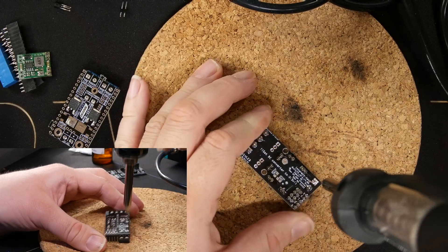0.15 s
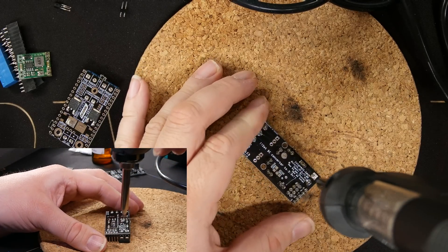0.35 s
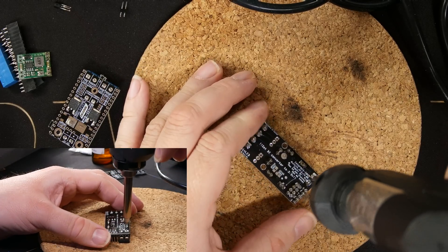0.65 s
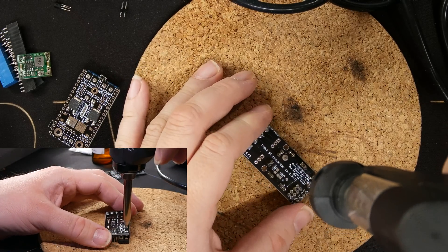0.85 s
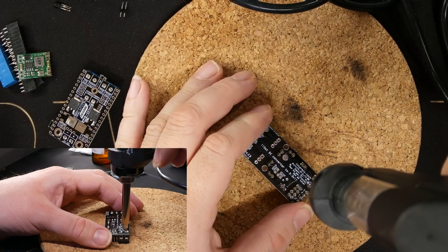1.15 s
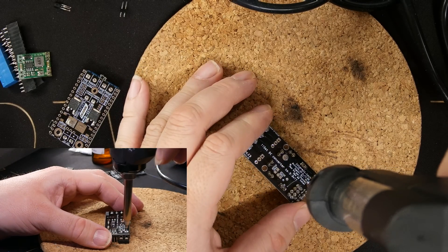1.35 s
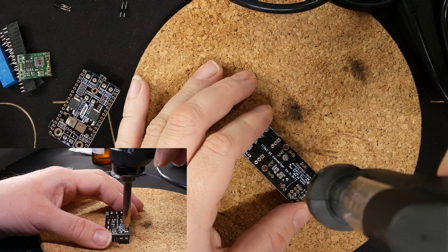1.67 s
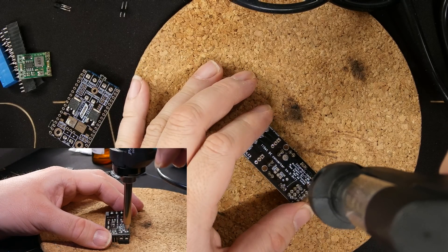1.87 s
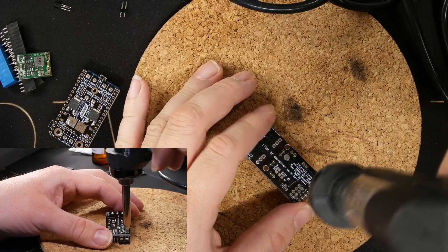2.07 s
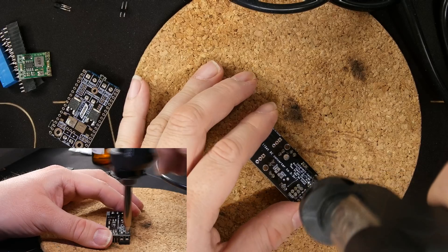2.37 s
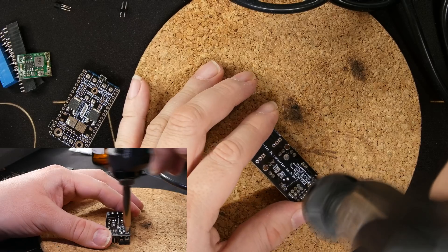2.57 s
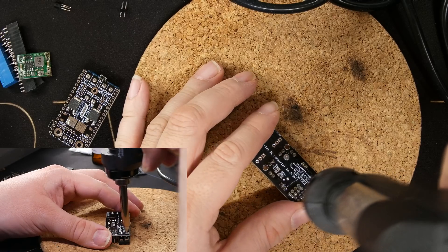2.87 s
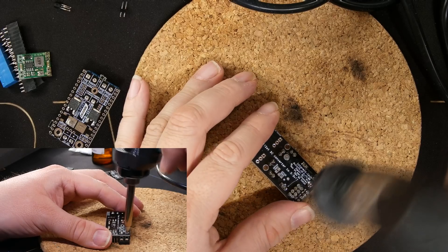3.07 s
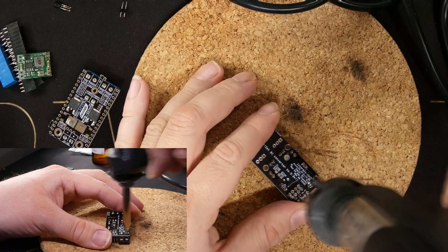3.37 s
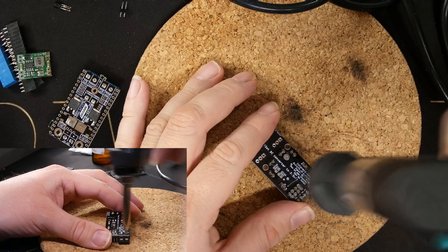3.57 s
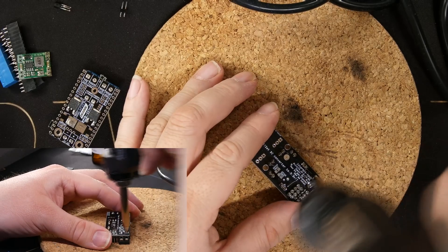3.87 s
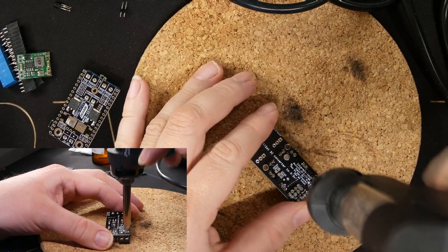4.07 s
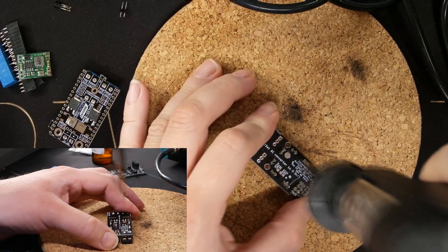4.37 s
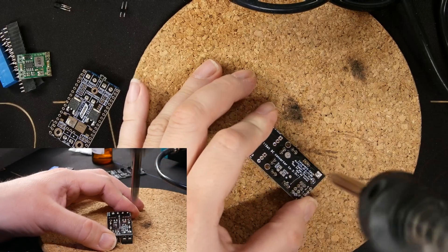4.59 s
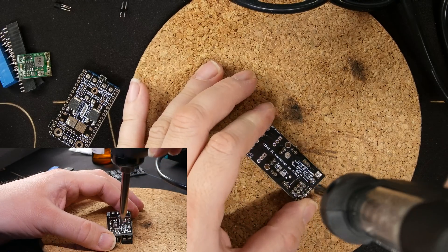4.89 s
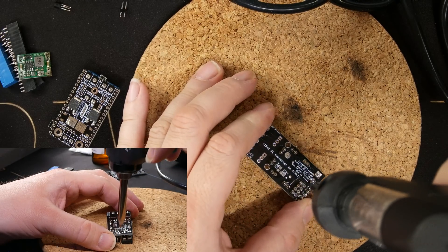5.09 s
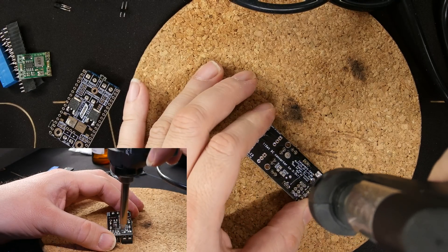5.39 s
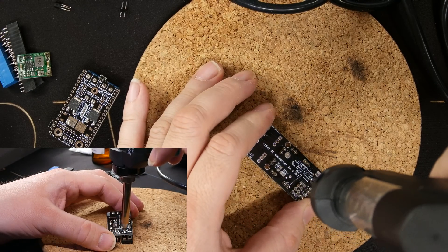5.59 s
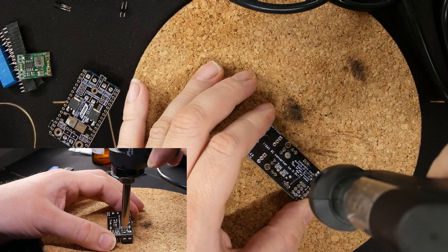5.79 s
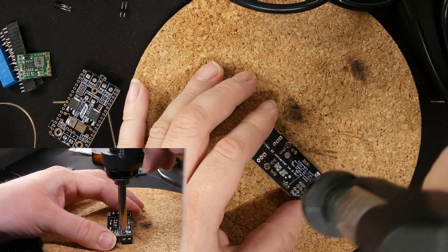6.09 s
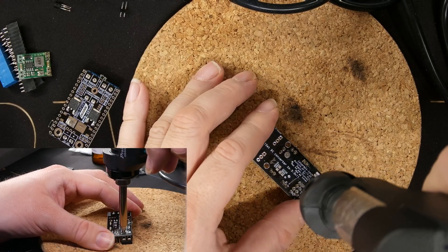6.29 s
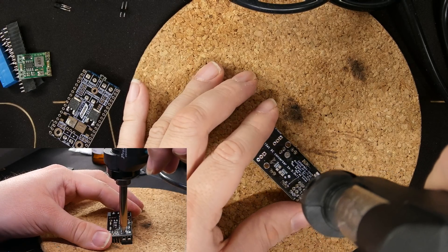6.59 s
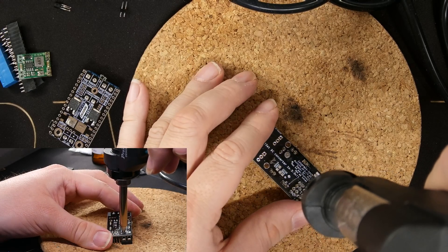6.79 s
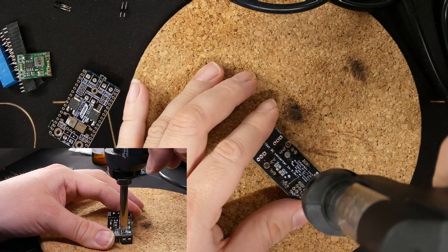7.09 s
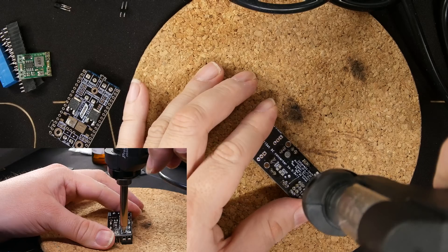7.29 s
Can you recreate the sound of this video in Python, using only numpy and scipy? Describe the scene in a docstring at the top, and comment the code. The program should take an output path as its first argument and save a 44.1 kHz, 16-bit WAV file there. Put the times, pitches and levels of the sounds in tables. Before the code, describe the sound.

A small desoldering pump coasts down, then after quiet taps clicks on, buzzes up to a hum, stops, and releases its vacuum with a pop and hiss.

```python
"""A desoldering gun is worked on a small circuit board on a cork mat, close to the microphone.
Its diaphragm pump spins up, draws air until the nozzle seals, hums, and coasts to a stop: one crank
drives the throb, valve clatter and pulsing air. Clicks, taps and bumps are short bursts or swings.
Lifting the nozzle breaks the vacuum with a pop and a hiss made of shaped noise.
Behind it lie quiet room noise and a faint electric whine made of pure tones."""
import sys
import numpy as np
from scipy import signal
from scipy.fft import rfft, irfft, next_fast_len
from scipy.io import wavfile
from scipy.ndimage import uniform_filter1d

SR = 44100
rng = np.random.default_rng(int(sys.argv[2]) if len(sys.argv) > 2 else 0)


def master(y):
    """Save y as 16-bit WAV."""
    cut = np.clip(np.atleast_2d(y).T, -1, 1)
    pcm = np.round(cut * 32767)  # scale
    wavfile.write(sys.argv[1], SR, pcm.astype(np.int16))


N = 328545
TIME = np.arange(N) / SR

# runs of the pump; the first is already coasting
# (motor on [s], motor off [s], throb level [dB], clatter level [dB], air level [dB])
PUMP_RUNS = [(-1.5, -.037, -12, -16, -5), (2.665, 3.998, 0, 0, 0), (6.911, 8, 0, 0, .5)]
# the changing load pulls the crank speed a little off its course: (time [s], speed change [Hz])
LOAD_PULL = [(2.83, -.3), (2.97, -1.6), (3.15, 1.3), (3.29, -.1), (3.48, 1.1), (3.57, 1), (3.78, -1),
             (4, .6), (7.1, 0), (7.22, -2.9), (7.32, -.2), (7.39, 1)]
# rattling is strong at low speed and settles under load: (crank speed [Hz], roughness [0-1])
ROUGHNESS_BY_SPEED = [(50, .9), (75, .55), (86, .3), (98, .18), (106, .12)]
# each low multiple of the crank speed swells as it crosses a resonance of the gun
# (relative level [dB], resonance [Hz], width [Hz], lift [dB])
THROB_ORDERS = [(-5.5, 98.5, 6.5, 9.5), (-5.5, 188, 32, 11.5), (-10, 324, 32, 8), (-25, 324, 36, 17)]
# how each voice of the pump follows the crank, one row each
# (level [dB], full above this speed [Hz], fall below it [dB per octave],
#  change when sealed [dB], fade once the motor is off [dB per s])
THROB_EFFORT = (-28.5, 72, 21, 0, 80)
CLATTER_EFFORT = (-42.3, 72, 14, 3, 50)
AIR_EFFORT = (-51.3, 88, 15, -12, 33)
# resonances of the plastic housing: (frequency [Hz], width [Hz], relative level [dB])
HOUSING_MODES = [(397.4, 40, 3.5), (529.4, 17, -2.5), (613.4, 32, -3), (747.7, 22, -5), (854, 39, 4),
                 (920, 16, 1), (945, 19, 3), (1020, 21.7, 4), (1075, 10.3, -1), (1245, 34, -4.5),
                 (1389, 100, -9.5), (1487, 18, -2), (1583, 50, -14), (1923.4, 12.2, 2), (1981, 99, -2.5),
                 (2198, 80, 0), (2250, 14, 0), (2367, 58, -1.5), (2463, 11, 1), (2604, 44, -6),
                 (2804, 25, -7), (3110, 39, -12), (3535, 35, -11), (4300, 320, -27), (4430, 20, -26)]
# the motor's springy mount: (frequency [Hz], width [Hz], relative level [dB])
MOUNT_MODES = [(880, 84, 1.5), (1015, 88, 0.5)]
# the motor can, rung by the brush ticks: (frequency [Hz], width [Hz], relative level [dB])
MOTOR_CAN_MODES = [(4120, 390, 1.5), (4320, 67, 17), (5300, 300, -8), (6630, 140, -11.5), (7070, 87, -2),
                   (8740, 740, -10.5), (10300, 620, -17)]
# tone colour of the pumped air: (frequency [Hz], relative level [dB])
AIR_SPECTRUM = [(1650, -34), (2800, -17.5), (3430, -2), (4110, -8), (4820, -4.5), (5110, -14), (5220, -11),
                (5820, -3), (6720, 1.5), (7600, -11), (8360, -4), (10800, -13), (11200, -18),
                (12200, -23.5), (15800, -23)]
# faint whistles of the air path: (frequency [Hz], width [Hz], relative level [dB])
AIR_WHISTLES = [(4970, 13, -2), (6160, 91, -8), (11400, 210, -23)]
# snaps of the trigger switch: (time [s], level [dB])
TRIGGER_SNAPS = [(2.6012, -40), (2.6526, -27), (3.9987, -23), (6.896, -28.5)]
# body of the switch: (frequency [Hz], width [Hz], relative level [dB])
SWITCH_MODES = [(1850, 220, 2.5), (2898, 260, 1.5), (3870, 430, -1), (6040, 690, -2), (6900, 750, 3.5),
                (9000, 680, -4.5), (10600, 1200, -5.5), (14200, 2000, -12)]
# ticks of loose plastic parts of the grip: (time [s], level [dB])
LOOSE_GRIP_TICKS = [(2.371, -46), (2.441, -42), (2.6095, -33.5), (4.104, -52), (6.834, -61), (6.92, -42)]
# body of the grip: (frequency [Hz], width [Hz], relative level [dB])
GRIP_MODES = [(1840, 230, 4.5), (2200, 260, -1.5), (3740, 120, 3), (6100, 250, -9), (6900, 100, -8),
              (9200, 200, -15)]
# the motor jolts its mount as it starts or stops: (time [s], level [dB])
MOTOR_JOLTS = [(.001, -48), (2.666, -37), (6.911, -31.5)]
# a thin ring dying away from the start: (time [s], level [dB], frequency [Hz], time to fall 60 dB [s])
LINGERING_RING = [(0, -66.5, 2290, 1)]
# tone colour of air seeping into the vacuum: (frequency [Hz], relative level [dB])
LEAK_SPECTRUM = [(530, -45), (900, -15), (1300, 1), (1510, -19), (1820, 1), (2570, -13), (3130, 0.5),
                 (4730, -10), (6350, -14), (15000, -37)]
# the seal breaking: (time [s], level [dB], time to fall 60 dB [s])
SEAL_POPS = [(4.3117, -31.5, 0.036), (4.323, -46, 0.22), (4.335, -47, .05)]
# tone colour of those pops: (frequency [Hz], relative level [dB])
POP_SPECTRUM = [(88, -30), (150, 5), (254, -4), (492, -7.5), (670, -16), (1590, -5.5), (2230, -47),
                (2770, -15), (3140, -32), (4990, -43), (6000, -38), (7800, -57), (13200, -120)]
# tone colour of the air rushing in: (frequency [Hz], relative level [dB])
INRUSH_SPECTRUM = [(240, -24), (400, 4), (625, -17), (675, 0), (740, -16), (976, -1), (1350, -15),
                   (2490, -4), (5140, -15), (6470, -5.5), (7550, -10), (11300, -9.5), (15800, -19)]
# solder spitting in the nozzle: (time [s], level [dB])
SOLDER_SPITS = [(4.492, -52), (4.508, -54), (4.523, -54), (4.592, -57), (4.608, -63), (4.642, -61)]
# nozzle touching the board: (time [s], level [dB], brightness [Hz], time to fall 60 dB [s])
NOZZLE_TAPS = [(.58, -61.5, 2200, .12), (.868, -58, 1260, .064), (.912, -62, 960, .035),
               (.984, -67, 1070, .12), (1.161, -59, 1530, .063), (1.4695, -50.5, 1900, .036),
               (1.524, -59, 1360, .11), (1.754, -64.5, 1370, .21), (1.916, -49, 1200, .15),
               (1.933, -49, 453, .085), (4.104, -50, 1300, .05), (4.586, -58.5, 3080, .044),
               (5.426, -56, 1480, .05), (5.654, -62.5, 1480, .093), (5.69, -65, 1400, .05),
               (6.352, -66, 1400, .057)]
# board and hand bumping on the mat: (time [s], relative level [dB], pitch [Hz])
MAT_BUMPS = [(.005, -45, 95), (.013, -38, 46), (.1, -49, 55), (.236, -47, 50), (1.469, -56, 100),
             (1.525, -54, 74), (1.789, -49, 44), (1.932, -38.5, 72), (1.99, -40.5, 55), (2.47, -50, 51),
             (2.63, -39, 29), (3.83, -31, 45), (3.87, -33, 25), (4.12, -36, 55), (4.316, -37, 75),
             (4.37, -38, 35), (5.432, -49, 82), (5.66, -48, 80), (5.74, -49, 61), (5.899, -52, 80)]
# tone colour of the quiet room: (frequency [Hz], relative level [dB])
ROOM_SPECTRUM = [(15, -50), (25, -2), (82, -11.5), (216, -8.5), (307, -12.5), (461, -12), (500, -15.5),
                 (905, -20), (2390, -30.5), (3130, -30), (3880, -33), (6660, -33), (15800, -35)]
# three timbres of the faint electric whine: (frequency [Hz], level before the spell's own [dB])
FULL_WHINE = [(3090, -84), (5146, -88), (6519, -92), (6864, -87), (8920, -92), (9265, -92), (9604, -90),
              (10977, -95), (11321, -95)]
PLAIN_WHINE = [(3090, -79.5), (6519, -88), (9259, -93), (9604, -91), (9948, -95)]
THIN_WHINE = [(3090, -86.5), (4457, -92), (4802, -92), (5146, -93), (6519, -89.5), (7203, -94), (8920, -90),
              (9265, -92), (10632, -93), (11321, -96)]
# when the whine is heard: (from [s], to [s], level change [dB], timbre [one of the tables above])
WHINE_SPELLS = [(.21, 0.603, 2.5, FULL_WHINE), (.6, .91, -1.5, FULL_WHINE), (1.14, 1.92, 1, FULL_WHINE),
                (2.3, 2.603, 0, FULL_WHINE), (4.84, 5.125, 2.5, PLAIN_WHINE),
                (5.264, 5.597, -0.5, PLAIN_WHINE), (5.855, 6.72, 1, THIN_WHINE)]

# the crank closes in on full speed with a quick kick and a slower climb
FULL_HZ, KICK_HZ, KICK_S, CLIMB_HZ, CLIMB_S = 107, 16, .04, 47, .225
# switched off, it is braked by drag and by dry friction
DRAG_S, FRICTION_HZ_PER_S = .45, 211
# the nozzle is half sealed this long after each start, and takes this long to close
SEAL_AFTER_S, SEAL_CLOSE_S = .41, .11
# the clatter comes in uneven knocks at low speed (typical swing at full roughness, changes per second)
KNOCK_DB, KNOCK_RATE_HZ = 3, 40
# each switch snap bounces once: this much later, this much weaker
BOUNCE_S, BOUNCE_DB = .0013, -4.5
# air seeps in from the motor's stop until the nozzle lifts: a first gush over an even trickle
STOP_S, LIFT_S = 4.02, 4.314
GUSH_DB, GUSH_T60_S, TRICKLE_DB = -56, .35, -62
# the inrush weakens as the chamber fills, then dies away; one surge comes just after the lift
INRUSH_DB, INRUSH_FALL_DB_PER_S, FILL_S, INRUSH_T60_S = -51, 38, .31, .3
SURGE_AFTER_S, SURGE_DB, SURGE_T60_S = .022, -49, .06
BUMP_T60_S = .27  # the mat damps all bumps alike
ROOM_DB = -65.8
TOP_HZ = 15900


def pump():
    """Crank speed drives the throb, the valves, the brushes and the pulsing air."""
    runs = np.array(PUMP_RUNS)
    latest_run = np.searchsorted(runs[:, 0], TIME) - 1
    on, off, *run_db = runs[latest_run].T
    age = TIME - on
    idle = np.maximum(TIME - off, 0)
    speed = crank_speed(age, idle)
    turns = np.cumsum(speed) / SR
    rough = np.interp(speed, *np.transpose(ROUGHNESS_BY_SPEED))
    sealed = np.clip((age - SEAL_AFTER_S) / SEAL_CLOSE_S + .5, 0, 1) * (TIME < off)

    # the gun sways in the hand as it shakes
    sway = colour(noise(), [(15, 4), (30, -4), (60, -17), (110, -35), (200, -36)])
    hum = throb(turns, speed, rough) + undb(-25) * sway
    knocks = undb(KNOCK_DB * rough * wander(KNOCK_RATE_HZ))
    clatter = (valves(turns, rough) + undb(-34.5) * brushes(turns, rough)) * knocks

    voices = zip([hum, clatter, airflow(turns)], [THROB_EFFORT, CLATTER_EFFORT, AIR_EFFORT], run_db)
    return sum(voice * undb(db) * effort(law, speed, sealed, idle) for voice, law, db in voices)


def crank_speed(age, idle):
    """Turns per second: the motor spins up, hums under its load, and coasts to a stop."""
    spin_up = FULL_HZ - KICK_HZ * np.exp(-age / KICK_S) - CLIMB_HZ * np.exp(-age / CLIMB_S)
    driven = spin_up + curve(LOAD_PULL)
    friction = FRICTION_HZ_PER_S * DRAG_S
    return np.maximum((driven + friction) * np.exp(-idle / DRAG_S) - friction, 0)


def effort(law, speed, sealed, idle):
    """Gain of one pump voice: it grows with speed, shifts with the seal, and fades with the motor off."""
    db, knee_hz, db_per_octave, sealed_db, fade_db_per_s = law
    octaves = np.log2(np.clip(speed / knee_hz, 1e-6, 1))
    return undb(db + db_per_octave * octaves + sealed_db * sealed - fade_db_per_s * idle)


def throb(turns, speed, rough):
    """The diaphragm stroke shakes the gun at low multiples of crank speed, unevenly at low speed."""
    even = 0
    for order, (db, hz, width_hz, lift_db) in enumerate(THROB_ORDERS, start=1):
        lift = lift_db / (1 + (2 * (order * speed - hz) / width_hz) ** 2)
        even = even - undb(db + lift) * np.cos(2 * np.pi * order * turns)
    shake = colour(noise(), [(40, -36), (90, -2), (200, -3), (340, -5.5), (480, -30.5), (900, -40)])
    return (1 - rough ** 2) * even + undb(2) * rough ** 2 * steady(shake)


def valves(turns, rough):
    """Outlet and inlet valves slap in turn and ring the plastic housing; the crank rubs between."""
    outlet = slaps(turns, .06, rough, scatter_db=5, jitter_s=.0001)
    inlet = slaps(turns, .598, rough, scatter_db=7, jitter_s=.00016)
    rub = noise() * puffs(turns, .1, depth=.9) * rough
    force = steady(outlet + .3 * inlet) + 1.25 * rub
    # the hand's grip shifts, so each resonance swells and sinks on its own
    body = 0
    for k, (hz, width_hz, db) in enumerate(HOUSING_MODES):
        body = body + (-1) ** k * undb(db + 2 * wander(4)) * band(force, hz, width_hz)
    # the slap itself is a short crack besides the ringing
    crack_filter = signal.butter(3, [1980, 2680], "band", fs=SR, output="sos")
    crack = undb(-9) * signal.sosfilt(crack_filter, force)
    # at low speed the motor chatters on its mount
    chatter = undb(11) * rough * ring(rub, MOUNT_MODES)
    low_cut = signal.butter(4, 370, "high", fs=SR, output="sos")
    return steady(signal.sosfilt(low_cut, body + crack + chatter))


def brushes(turns, rough):
    """The motor brushes tick once per turn and ring the motor can."""
    ticks = slaps(turns, .3, rough, scatter_db=6, jitter_s=.00004)
    return steady(ring(ticks, MOTOR_CAN_MODES))


def slaps(turns, lag, rough, scatter_db, jitter_s):
    """One short knock each turn; roughness makes its force and timing uneven."""
    at = np.interp(np.arange(1, int(turns[-1]) - 1) + lag, turns, np.arange(N))
    loose = rough[at.astype(int)]
    chance = rng.standard_normal((len(at), 2))
    at = np.clip(at + jitter_s * SR * loose * chance[:, 0], 0, N - 2)
    force = undb(scatter_db * loose * chance[:, 1])
    # share each knock between two neighbouring samples, to place it exactly
    first, part = at.astype(int), at % 1
    return np.bincount(first, force * (1 - part), N) + np.bincount(first + 1, force * part, N)


def airflow(turns):
    """Air hisses in one surge per turn and whistles in its channel."""
    surges = noise() * puffs(turns, .3, depth=.36)
    return colour(surges, AIR_SPECTRUM) + undb(-7.5) * unit(ring(surges, AIR_WHISTLES))


def puffs(turns, lag, depth):
    """A strength that swells once per turn, as a surge of air or a rub does."""
    return 1 + np.clip(depth, 0, 1) * np.cos(2 * np.pi * (turns - lag))


def trigger():
    """The grip ticks, the switch snaps and bounces, the motor jolts its mount, and a thin ring lingers."""
    grip = strikes(LOOSE_GRIP_TICKS, GRIP_MODES, t60=0.0076, tail_db=-16, tail_t60=0.16)
    bounces = [(s + BOUNCE_S, db + BOUNCE_DB) for s, db in TRIGGER_SNAPS]
    switch = strikes(TRIGGER_SNAPS + bounces, SWITCH_MODES, t60=0.0069, tail_db=-20, tail_t60=0.17)
    jolt = strikes(MOTOR_JOLTS, MOUNT_MODES, t60=0.053, tail_db=-11.5, tail_t60=0.26)
    thin = 0
    for s, db, hz, t60 in LINGERING_RING:
        tone = steady(band(band(noise(), hz, 64), hz, 57))
        thin = thin + undb(db) * decay(s, t60) * tone
    return grip + switch + jolt + thin


def vacuum():
    """Air seeps past the nozzle, then pops and rushes in as it lifts, spitting solder."""
    seep = (undb(TRICKLE_DB) + undb(GUSH_DB) * decay(STOP_S, GUSH_T60_S)) * during(STOP_S, LIFT_S)
    pops = colour(noise(), POP_SPECTRUM) * sum(undb(db) * decay(s, t60) for s, db, t60 in SEAL_POPS)

    since = np.maximum(TIME - LIFT_S, 0)
    dying = np.exp(-np.log(1000) * np.maximum(since - FILL_S, 0) / INRUSH_T60_S) * (TIME > LIFT_S)
    flutter = undb(1.5 * wander(40))
    inrush = undb(INRUSH_DB - INRUSH_FALL_DB_PER_S * since) * dying * flutter
    surge = undb(SURGE_DB) * decay(LIFT_S + SURGE_AFTER_S, SURGE_T60_S)

    spit_modes = [(11600, 1000, 2), (12300, 700, -7)]
    spits = strikes(SOLDER_SPITS, spit_modes, t60=0.039, tail_db=-22, tail_t60=.1)
    leak = seep * colour(noise(), LEAK_SPECTRUM)
    return leak + pops + (inrush + surge) * colour(noise(), INRUSH_SPECTRUM) + spits


def board():
    """The nozzle taps the damped board; the mat and bench answer with dull bumps."""
    out = np.zeros(N)
    grit = noise()
    for s, db, hz, t60 in NOZZLE_TAPS:
        knock = unit(band(band(grit, hz, .8 * hz), hz, 1.3 * hz))
        out += undb(db) * decay(s, t60) * knock
    for s, db, hz in MAT_BUMPS:
        angle = 2 * np.pi * hz * (TIME - s)
        swing = np.sin(angle) + 0.43 * np.sin(1.6 * angle)
        # the difference of two decays gives a soft start
        out += undb(db) * (decay(s, BUMP_T60_S) - decay(s, BUMP_T60_S / 10)) * swing
    return out


def background():
    """Quiet room noise and an on-and-off electric whine of pure tones."""
    out = undb(ROOM_DB) * colour(noise(), ROOM_SPECTRUM)
    for start, end, spell_db, partials in WHINE_SPELLS:
        whine = 0
        for hz, db in partials:
            whine = whine + undb(db) * np.sqrt(2) * np.sin(2 * np.pi * (hz * TIME + rng.random()))
        out = out + undb(spell_db) * during(start, end) * whine
    return out


def strikes(rows, modes, t60, tail_db, tail_t60):
    """Short gritty contacts, each with a weak rattling tail, ring a body."""
    force = sum(undb(db) * (decay(s, t60) + undb(tail_db) * decay(s, tail_t60)) for s, db in rows)
    grit = np.sign(noise())
    return ring(grit * force, modes) / np.std(ring(grit, modes))


def ring(x, modes):
    """A body that rings at several resonances, with alternating signs."""
    return sum((-1) ** k * undb(db) * band(x, hz, width) for k, (hz, width, db) in enumerate(modes))


def band(x, hz, width_hz):
    """One resonance, gain 1 at its centre."""
    return signal.lfilter(*signal.iirpeak(hz, hz / width_hz, fs=SR), x + 1e-18)


def colour(x, points):
    """Give a sound a spectrum of (frequency [Hz], level [dB]) points, at rms 1."""
    hz, db = np.transpose(points)
    size = next_fast_len(N)
    bins = np.arange(size // 2 + 1) * SR / size
    gain = undb(np.interp(np.log(bins + 1), np.log(hz), db))
    return unit(irfft(rfft(x, size) * gain, size)[:N])


def decay(start, t60):
    """A sudden start that dies by 60 dB in t60 seconds."""
    out = np.zeros(N)
    span = slice(int(start * SR), int((start + 2 * t60) * SR))
    out[span] = np.exp(-np.log(1000) * (TIME[span] - TIME[span][0]) / t60)
    return out


def during(start, end):
    """1 between two times, with soft edges."""
    return uniform_filter1d(((TIME >= start) & (TIME <= end)) * 1., size=200)


def curve(rows):
    """The second column of a table, joined by straight lines in time."""
    rows = np.array(rows)
    return np.interp(TIME, rows[:, 0], rows[:, 1])


def wander(rate_hz):
    """A slow random drift with a spread near 1."""
    steps = np.arange(0, TIME[-1] + 1, 1 / rate_hz)
    return np.interp(TIME, steps, rng.standard_normal(len(steps)))


def steady(x):
    """Hold a sound near rms 1 over a few crank turns."""
    power = uniform_filter1d(uniform_filter1d(x ** 2, size=1300), size=1300)
    floor = np.mean(x ** 2) / 10 ** 4  # keeps near-silence from being blown up
    return x / np.sqrt(np.abs(power) + floor)


def unit(x):
    """Scale to rms 1."""
    return x / np.sqrt(np.mean(x ** 2))


def noise():
    """White noise."""
    return rng.standard_normal(N)


def undb(db):
    """Decibels to gain."""
    return 10 ** (np.asarray(db) / 20)


def scene():
    """Everything on the bench, heard by one microphone."""
    return (pump() + trigger() + vacuum() + board() + background())[None]


def record(dry):
    """The recorder cuts the top."""
    top_cut = signal.ellip(10, .2, 70, TOP_HZ, fs=SR, output="sos")
    return signal.sosfilt(top_cut, dry)


dry = scene()
out = record(dry)
master(out)
```